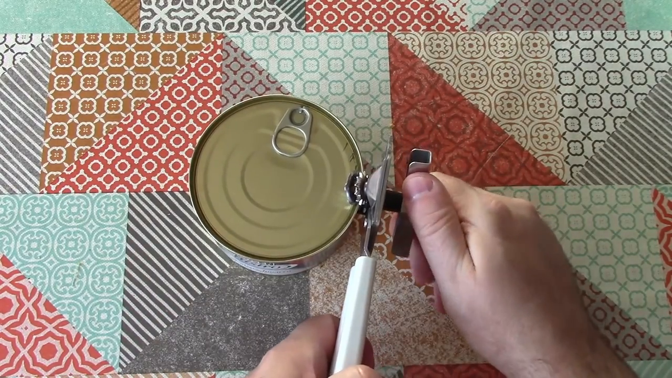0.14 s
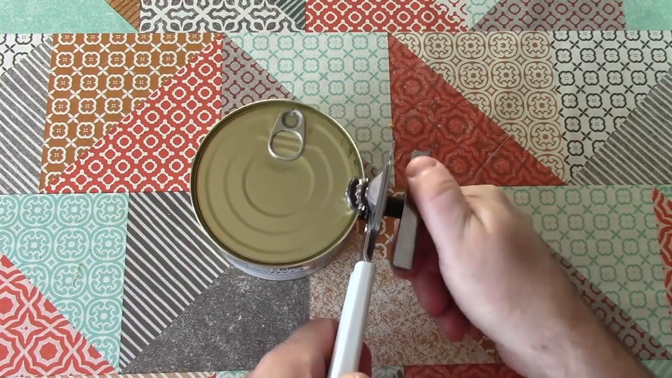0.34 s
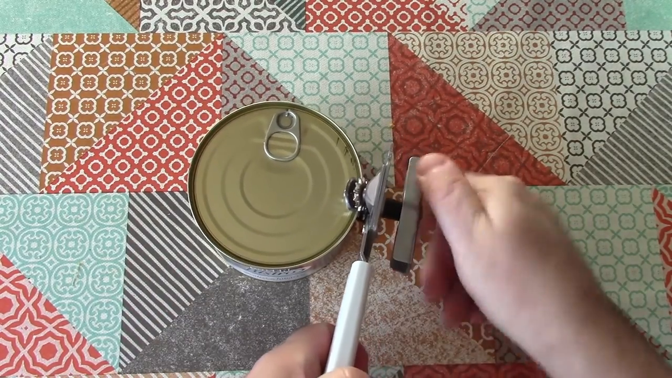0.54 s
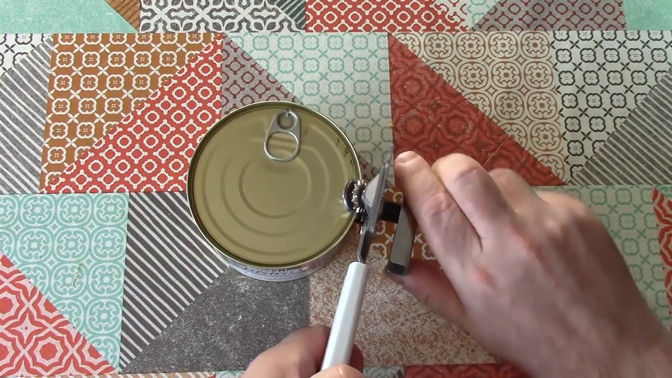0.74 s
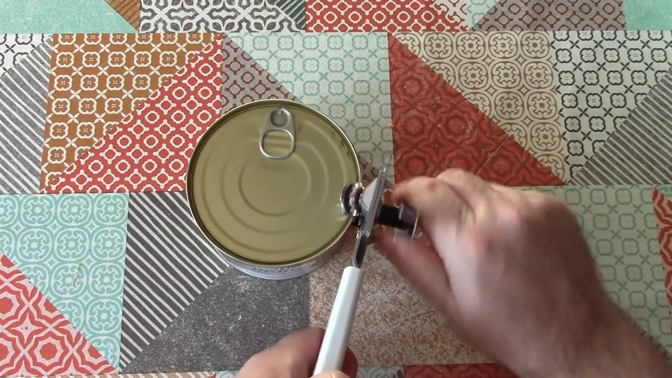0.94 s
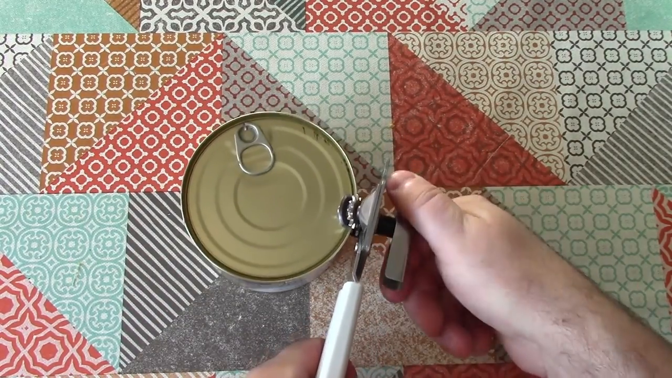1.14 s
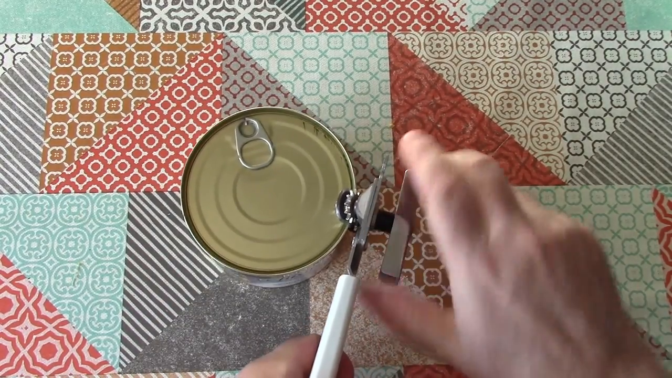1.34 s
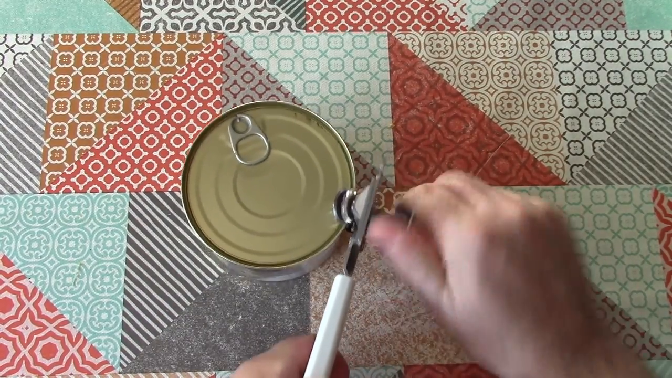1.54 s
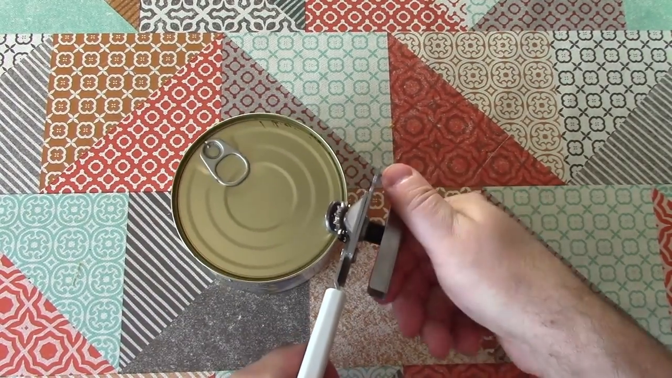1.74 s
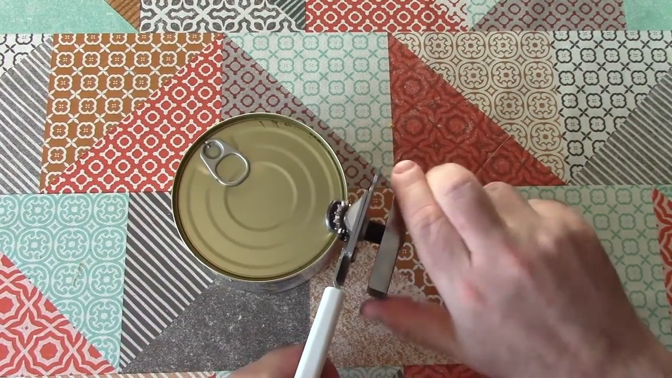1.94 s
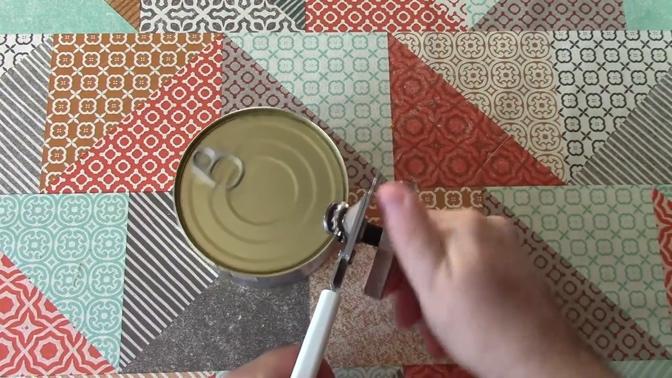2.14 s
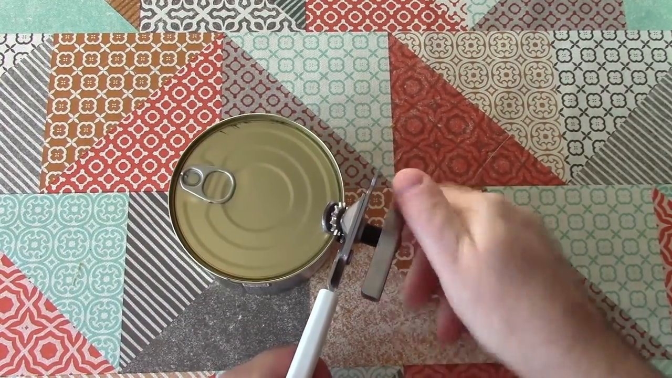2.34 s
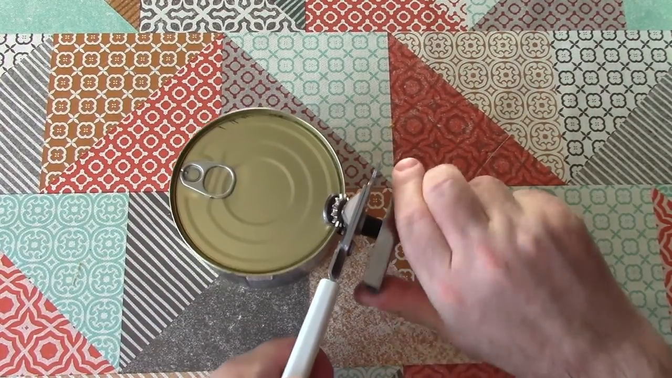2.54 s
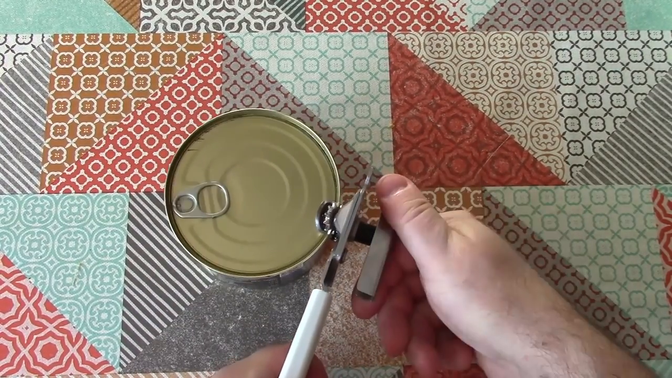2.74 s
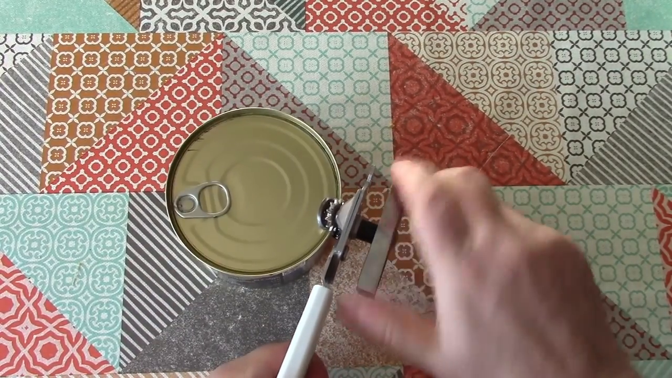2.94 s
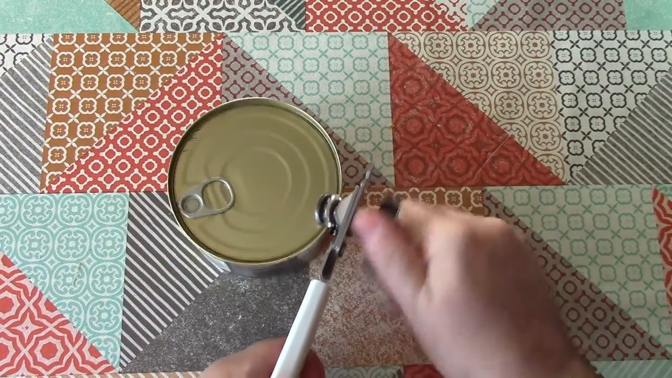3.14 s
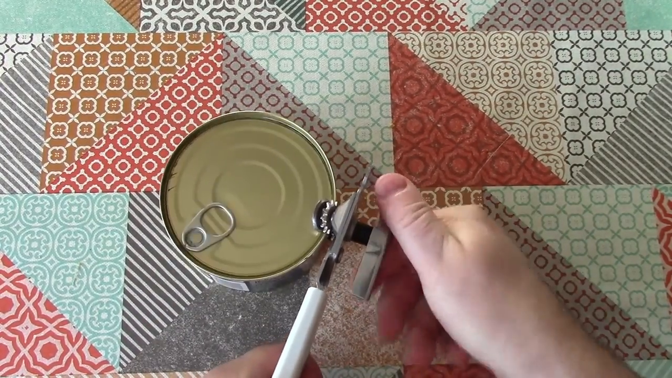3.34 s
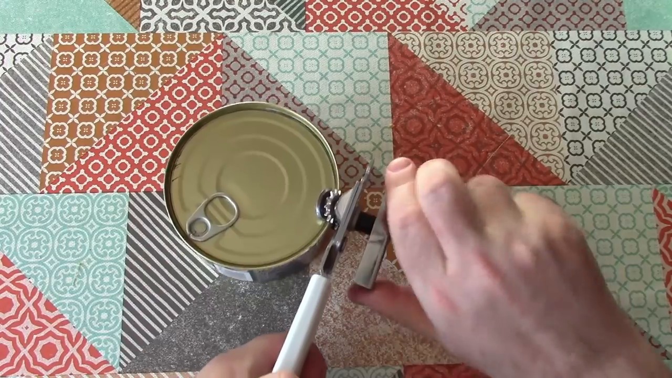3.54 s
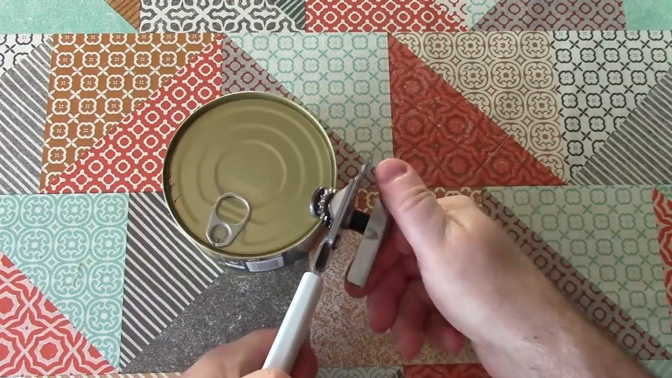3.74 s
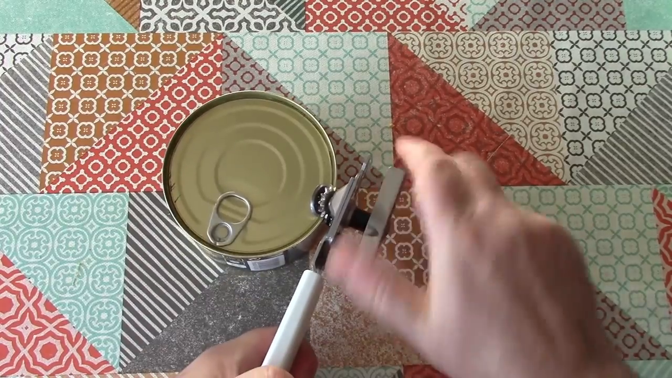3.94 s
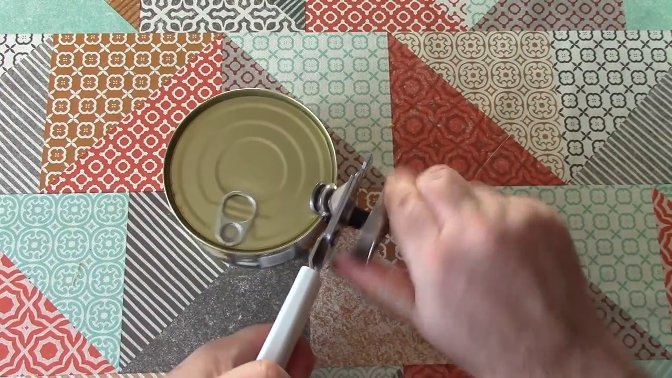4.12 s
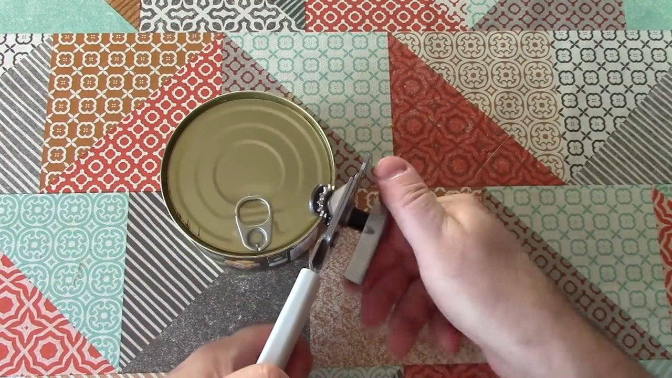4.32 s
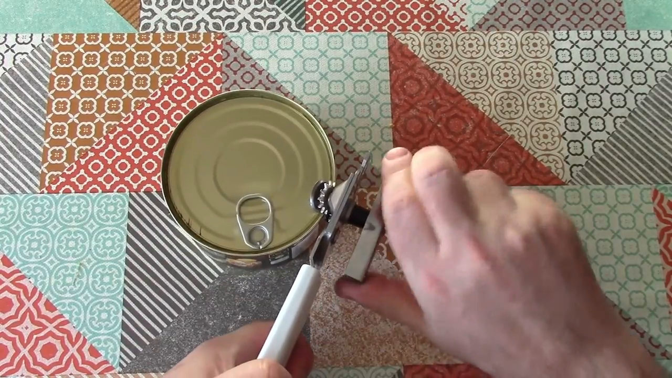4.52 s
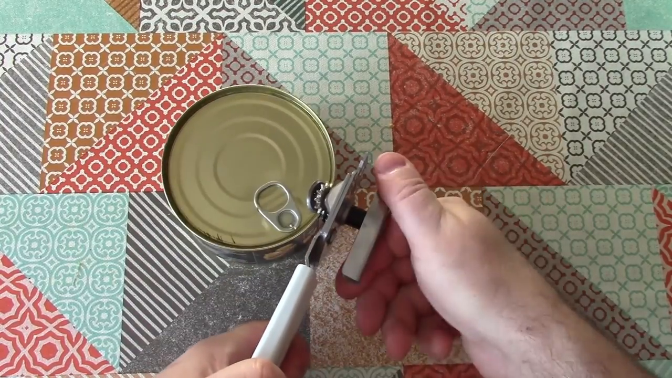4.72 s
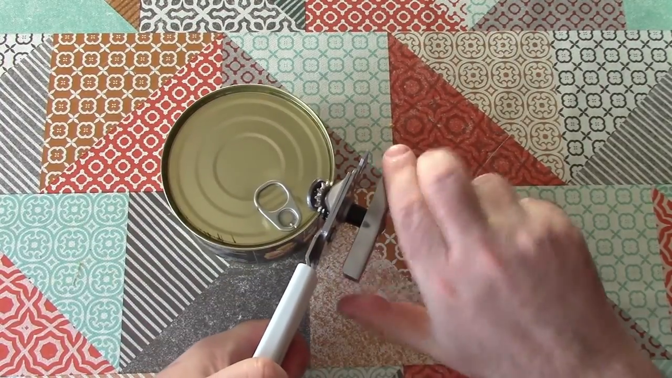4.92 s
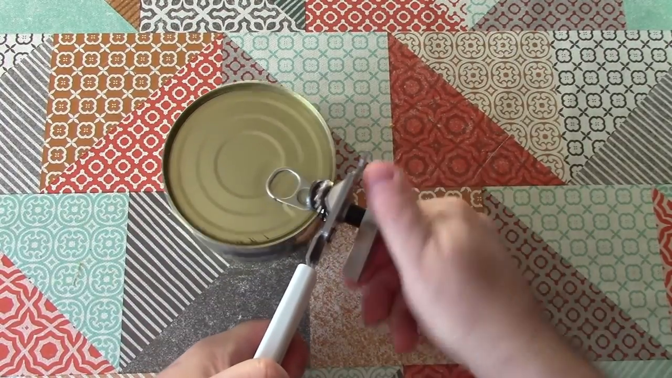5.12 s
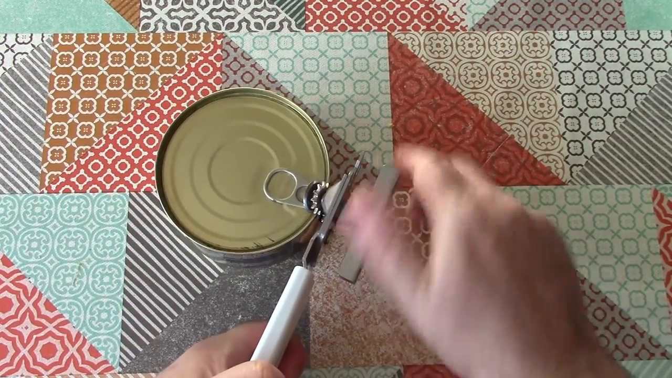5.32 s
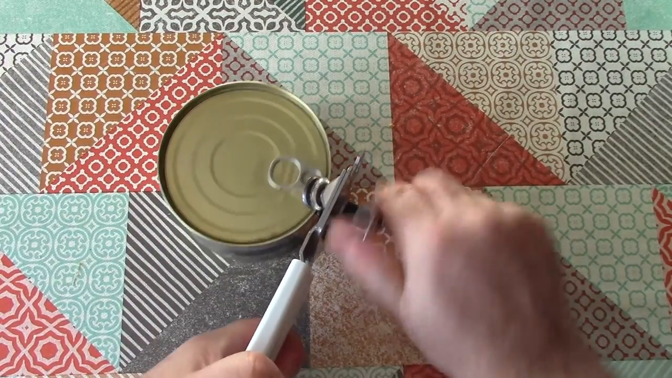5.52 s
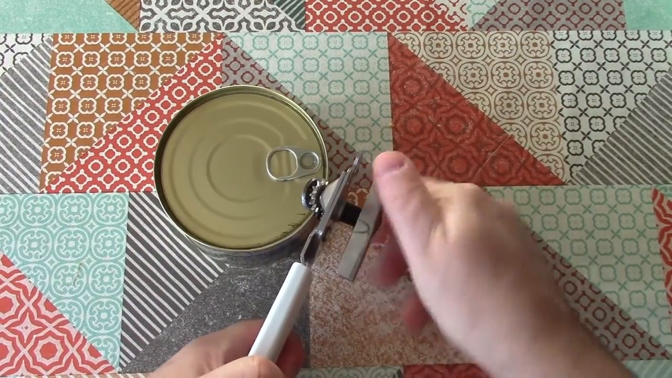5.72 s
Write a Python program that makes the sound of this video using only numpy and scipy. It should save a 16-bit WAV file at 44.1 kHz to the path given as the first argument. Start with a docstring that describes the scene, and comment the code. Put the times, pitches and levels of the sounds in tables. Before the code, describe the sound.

Rhythmic gritty metallic crunches with sharp clicks, roughly two a second, as a can opener is cranked around a tin; light handling between.

```python
"""A hand-turned can opener walks round a full tin on a covered table, heard from close by. Each half turn of
the key grinds the wheel through the lid (rough noise ringing the tin), while the feed gear snaps tooth by
tooth over the rim (short noise bursts). The loose steel key jingles and the table booms softly (fading sine
waves), and fingers peel off the steel (fizzing noise). A quiet room answers and hums behind (shaped noise)."""
import sys
import numpy as np
from scipy import signal
from scipy.fft import rfft, irfft, next_fast_len
from scipy.io import wavfile
from scipy.ndimage import map_coordinates

SR = 44100
rng = np.random.default_rng(int(sys.argv[2]) if len(sys.argv) > 2 else 0)


def inscribe(sig):
    """Save sig as 16-bit PCM at rate SR to the path in sys.argv[1].

    A 1-D sig is mono; a 2-D sig holds one channel per row.
    Samples are clipped to [-1, 1] before scaling.
    """
    pcm = np.round(np.clip(np.atleast_2d(sig).T, -1, 1) * 32767)
    wavfile.write(sys.argv[1], SR, pcm.astype(np.int16))


N = 259175  # length in samples

# Half turns of the key. Each row: wheel bites in seconds, push lasts in seconds, swell to the bite in dB/s,
# fall after the push in dB/s, grind at the bite in dB, grind at the end of the push in dB, bass of the tin
# against its other tones in dB, highest cutter scrape in dB, highest tearing hiss in dB,
# delay from the bite to the strongest table sway in seconds, table sway in dB.
HALF_TURNS = [(0.361, 0.021, 900, 235, -38.5, -33, 1, -56, -49, 0.059, -39),
              (0.923, 0.17, 700, 183, -37.5, -26, -1, -47.5, -51, 0.21, -39),
              (1.553, 0.091, 608, 201, -33, -20.5, 2.5, -35, -44.5, .04, -31),
              (2.108, 0.092, 1500, 240, -26, -21.5, -1.5, -33.5, -43.5, 0.11, -27),
              (2.634, 0.086, 500, 261, -30, -19.5, -2.5, -34.5, -44, 0.086, -26.5),
              (3.145, 0.086, 700, 269, -26.5, -17.5, -6.5, -40, -47, .16, -36.5),
              (3.693, 0.067, 350, 270, -26.5, -18.5, -2.5, -34.5, -44, 0.11, -45.5),
              (4.176, 0.058, 603, 253, -26, -20.5, -5, -29.5, -40, .11, -36.5),
              (4.657, 0.044, 504, 276, -26, -19.5, 1.5, -30.5, -41.5, 0.043, -30),
              (5.103, 0.06, 800, 236, -28.5, -16, 0.5, -30.5, -42, 0.076, -32),
              (5.555, 0.054, 600, 243, -30, -16.5, -0.5, -33.5, -42, 0.08, -25)]


def amp(db):
    """Turn decibels into a gain."""
    return 10 ** (np.asarray(db) / 20)


def unit(x):
    """Scale a sound to an average (RMS) level of one."""
    return x / np.sqrt(np.mean(x ** 2) + 1e-20)


def shape(points):
    """Gain at any frequency, from (Hz, dB) points joined on a log axis."""
    f, v = np.transpose(points)
    return lambda hz: amp(np.interp(np.log(hz + 1), np.log(f + 1), v, left=-120))


def resonant(modes):
    """Response of (Hz, width in Hz, dB) resonances; widths under 22 Hz are raised to 22."""
    def peak(f, center, width):
        return 1j * f * width / (center * center - f * f + 1j * f * width)

    def response(f):
        # neighbours have opposite signs
        return sum((-1) ** k * amp(db) * peak(f, center, max(width, 22))
                   for k, (center, width, db) in enumerate(modes))
    return response


def causal(gain):
    """A response with this gain that answers at once and never early (minimum phase)."""
    cepstrum = irfft(np.log(gain + 1e-6))
    # fold the half before time zero onto the half after it
    cepstrum[1:len(cepstrum) // 2] *= 2
    cepstrum[len(cepstrum) // 2 + 1:] = 0
    return np.exp(rfft(cepstrum))[:len(gain)]


def filtered(x, response):
    """Shape the spectrum of a sound by a response of frequency."""
    m = 2 * next_fast_len(N // 2 + SR // 4)  # spare room for ringing
    return irfft(rfft(x, m) * response(np.fft.rfftfreq(m, 1 / SR)), m)[..., :N]


def wobble(rate):
    """A smooth random curve through this many random points a second."""
    knots = rng.standard_normal(int(N * rate / SR) + 4)
    return map_coordinates(knots, [np.arange(N) * rate / SR])


def grit(rate, spread_db):
    """Noise whose level wavers quickly, like many tiny slips."""
    return unit(rng.standard_normal(N) * amp(spread_db * wobble(rate)))


def add(track, s, sound):
    """Mix a sound into the track at s seconds."""
    track[round(s * SR):][:len(sound)] += sound


def swell(start, end, start_db, end_db, rise, fall):
    """Gain of events that rise to their start, run straight to their end and fall, in dB/s; powers add."""
    t = np.arange(0, N + 64, 32)[:, None] / SR  # every 32 samples is fine enough
    along = np.clip((t - start) / np.maximum(end - start, 1e-4), 0, 1)
    before = np.maximum(start - t, 0)
    after = np.maximum(t - end, 0)
    db = start_db + (end_db - start_db) * along - rise * before - fall * after
    return np.interp(np.arange(N) / SR, t[:, 0], np.sqrt(np.sum(amp(db) ** 2, axis=1)))


def struck(events, families, attack, shake_db, spread_db):
    """Each event rings every family of modes at its own strength, as slightly unsteady fading sines."""
    out, t = np.zeros(N + SR), np.arange(SR // 4) / SR
    for s, *family_db in events:
        for db, modes in zip(family_db, families):
            for hz, level, t60 in modes:
                shake = shake_db * np.interp(t, np.linspace(0, t[-1], 50), rng.standard_normal(50))
                fading_db = db + level + spread_db * rng.normal() + shake - 60 * t / t60
                ring = amp(fading_db) * np.sin(2 * np.pi * hz * t)
                add(out, s, ring * (1 - np.exp(-t / attack)))
    return out[:N]


def in_tin(force):
    """The tin answers with main tones over a broad bed of small ones; its bass drifts from turn to turn."""
    # Broad bed of the tin. Each row: frequency in Hz, level in dB per Hz.
    bed = [(100, -10), (250, -12.5), (600, -5.5), (1200, -16), (1700, -19), (2100, -17.5), (3600, -25.5),
           (5000, -14), (16000, -111)]
    # Main tones of the full tin. Each row: frequency in Hz, width in Hz, level in dB.
    tones = [(218, 31, -5), (241, 13.8, -4), (277, 26.3, 3.5), (331, 93, -2), (406.4, 10, -4.5),
             (498.1, 27.4, 6), (550, 11.8, -15.5), (732, 57, -28), (768, 13, -10), (918, 70, -5),
             (1090, 22, -6.5), (1197, 35, -9), (1341.5, 30, -7), (1560, 15, -9), (1714, 15, -12.5)]

    def response(f):
        power = shape(bed)(f) ** 2 + sum(abs(resonant([tone])(f)) ** 2 for tone in tones)
        soften = 1 / (1 + (f / 3000) ** 4)
        return causal(np.sqrt(power) * soften)

    ring = filtered(force, response)
    low_ring = filtered(ring, lambda f: 1 / (1 + (f / 334) ** 6))  # keeps what lies below about 334 Hz
    bite, push, *_, bass_db = np.transpose(HALF_TURNS)[:7]
    bass = amp(np.interp(np.arange(N) / SR, bite + push, bass_db))
    return ring + (bass - 1) * low_ring


def in_wheel(force):
    """The cutting wheel answers in one broad band."""
    # Tones of the cutting wheel, applied twice. Each row: frequency in Hz, width in Hz, level in dB per pass.
    wheel_tones = [(2316, 580, -3.5), (3050, 1300, -1.5)]

    def response(f):
        soften = 1 / (1 + 1j * f / 4000) ** 3
        return resonant(wheel_tones)(f) ** 2 * soften
    return filtered(force, response)


def efforts():
    """Gains of grind, scrape, hiss and table sway, from the turns and the hands shifting between them."""
    # Hands shifting on key and handles. Each row: time in seconds, shuffle in the tin in dB, skin hiss in dB.
    hand_shifts = [(0.291, -48, -56), (0.47, -63, -49), (0.61, -63, -56), (0.769, -46.5, -66),
                   (1.22, -53, -77), (1.29, -53, -69), (1.41, -50, -63), (1.85, -58, -66), (1.9, -57, -62),
                   (2.39, -54.5, -60), (2.96, -56.5, -62), (3.4, -50.5, -66), (3.64, -55, -61),
                   (3.93, -50.5, -68), (4.4, -52, -65), (4.86, -52, -63), (4.93, -64, -61),
                   (5.39, -72, -61.5), (5.76, -64, -62)]
    rub_rise, rub_fall, skin_fall = 302, 139, 404  # dB/s
    settle_db, settle_fall = -33.5, 95  # faint slower tail as tin and opener settle: dB under the grind, dB/s
    scrape_bite_db, scrape_fall = -12.5, 1.31  # dB under its top at the bite, times the fall of the grind
    tear_bite_db, tear_hold, tear_fall = -11, 0.0089, 1.29  # the same for the hiss, held longer in seconds
    sway_rise, sway_fall = 504, 208  # dB/s

    bite, push, rise, fall, bite_db, off_db, _, scrape_db, tear_db, lag, sway_db = np.transpose(HALF_TURNS)
    rub, shuffle_db, skin_db = np.transpose(hand_shifts)
    off = bite + push
    turning = swell(bite, off, bite_db, off_db, rise, fall)
    settle = swell(off, off, off_db + settle_db, off_db + settle_db, rise, settle_fall)
    loose = settle + swell(rub, rub, shuffle_db, shuffle_db, rub_rise, rub_fall)
    scrape = swell(bite, off, scrape_db + scrape_bite_db, scrape_db, rise, scrape_fall * fall)
    tear = swell(bite, off + tear_hold, tear_db + tear_bite_db, tear_db, rise, tear_fall * fall)
    skin = swell(rub, rub, skin_db, skin_db, rub_rise, skin_fall)
    sway = swell(bite + lag, bite + lag, sway_db, sway_db, sway_rise, sway_fall)
    grind = turning + loose
    # the cutter also scrapes under the shuffle, and the table sways a little with all grinding
    return grind, scrape + amp(-16) * loose, tear + skin, sway + amp(-17) * grind


def air():
    """Steady hum and hiss of the room, nearly alike in both channels."""
    # Colour of the room noise. Each row: frequency in Hz, relative level in dB.
    air_color = [(18, -32), (30, -1), (108, -2), (244, 1.5), (371, -4), (977, -13), (1140, -12),
                 (1300, -13), (1690, -17), (5650, -24), (6110, -24.5), (15700, -38)]
    mid, side = (unit(filtered(rng.standard_normal(N), shape(air_color))) for _ in range(2))
    return amp(-54.5) * np.array([mid + 0.45 * side, mid - 0.22 * side])


def table():
    """The turning hands keep the table's lowest tone wavering; bumps ring table and tin outright."""
    # Hands bumping things. Each row: time in seconds, table strength in dB, tin strength in dB.
    hand_bumps = [(0.211, -45.5, -44.5), (0.763, -28, -34.5), (1.124, -32.5, -53), (1.29, -36, -57),
                  (1.395, -36.5, -36), (1.497, -39.5, -47), (1.973, -51, -45), (2.495, -51.5, -71),
                  (2.612, -64, -34), (3.124, -39, -28), (3.533, -40, -61), (3.643, -66, -31),
                  (4.144, -64, -33.5), (4.52, -59, -60), (4.853, -60, -36), (4.956, -41.5, -64),
                  (5.085, -40, -34.5), (5.295, -48, -35.5), (5.497, -45.5, -60), (5.753, -41, -37)]
    # Tones of a thud, table first, then tin. Each row: frequency in Hz, level in dB, time to fade 60 dB in seconds.
    thud_tones = [
        [(137, 3.5, 0.25), (95, -5, 0.073)],
        [(252, 7.5, 0.041), (312, 3, 0.043)],
    ]
    table_hz = 129.1 * (1 + 0.0773 * wobble(30))
    phase = 2 * np.pi * np.cumsum(table_hz) / SR
    sway = efforts()[-1] * amp(3.07 * wobble(45)) * np.sin(phase)
    return sway + struck(hand_bumps, thud_tones, attack=.0015, shake_db=1.2, spread_db=1.5)


def teeth():
    """Each gear tooth snapping over the rim, and each clank of the loose key on its frame, is a short bright
    crack, a jolt of the cutter and a blow on the tin."""
    # Teeth snapping over the rim, and between turns the loose key clanking against its frame. Each row: time in
    # seconds, then the # relative strengths in dB of the crack, the ring of the cutter and the knock in the
    # tin.
    snaps_and_clanks = [(0.2116, -34, -60, -63), (0.2985, -38, -61, -21.5), (0.3595, -26, -35, -15.5),
                        (0.762, -34, -39, -50), (0.9213, -28.5, -28, -14.5), (0.958, -51, -44, -39),
                        (0.9818, -40, -25.5, -15), (1.0053, -22, -34, -15), (1.0202, -19.5, -17, -21),
                        (1.0526, -12.5, -17.5, -9), (1.0864, -21, -48, -35), (1.1235, -22, -29, -23.5),
                        (1.393, -26, -60, -43), (1.439, -32.5, -51, -47), (1.48, -35.5, -60, -48),
                        (1.5514, -40, -47, -29), (1.584, -13.5, -14.5, -9.5), (1.605, -9.5, -22, -6),
                        (1.6127, -33, -17, -3.5), (1.625, -19, -14, -17), (1.6961, -22, -16.5, -15.5),
                        (1.7804, -42, -62, -56), (1.8033, -37.5, -46, -31.5), (1.8274, -45, -57, -49),
                        (2.1064, -21, -15.5, -13.5), (2.137, -18, -18, -5.5), (2.1596, -22, -23, -10),
                        (2.1814, -9.5, -9.5, -14), (2.2034, -37, -12.5, -15), (2.3418, -34, -41, -33),
                        (2.391, -45, -26.5, -50), (2.582, -40, -55, -45), (2.6085, -34, -51, -36),
                        (2.63, -20, -23, -15.5), (2.6613, -24, -31, -12.5), (2.6814, -9, -31, -8),
                        (2.6909, -13, -10, -22), (2.7147, -21, -12, -2.5), (2.7506, -20, -17, -15),
                        (2.8798, -35, -57, -34.5), (3.0195, -54, -47, -34), (3.1224, -45, -44, -30),
                        (3.1327, -49, -26.5, -34), (3.1419, -20, -13.5, -8.5), (3.1699, -14, -13.5, -5.5),
                        (3.192, -17, -32, -15), (3.2152, -10, -37, 0), (3.2362, -17.5, -42, -5),
                        (3.3147, -52, -53, -28), (3.4112, -48, -28.5, -31.5), (3.6424, -48, -54, -41),
                        (3.6843, -21, -19, -15), (3.708, -13.5, -43, -12), (3.7247, -5, -39.5, -8),
                        (3.7417, -6, -19, -39), (3.7593, -31, -30, -25), (3.795, -21, -21, -43),
                        (3.923, -34, -37, -31), (4.1437, -52, -52, -40), (4.1674, -17.5, -6.5, -10),
                        (4.19, -18, -14, -16), (4.2004, -28, -33, -12), (4.2101, -11, -30, -6),
                        (4.2229, -14, -31, -8), (4.2399, -9.5, -12, -12), (4.398, -48, -30.5, -45),
                        (4.6349, -20, -22, -16.5), (4.6561, -13, -22.5, -36), (4.673, -14.5, -31, -40),
                        (4.682, -7, -35, -26), (4.7023, -14, -11.5, -7), (4.729, -26.5, -16, -13),
                        (4.8354, -35, -49, -52), (4.8532, -49, -32, -30), (4.99, -58, -59, -33.5),
                        (5.063, -30, -51, -55), (5.1037, -18, -13.5, -11), (5.125, -15, -10.5, -13),
                        (5.1436, -19, -22, -10), (5.1586, -3.5, -33, -10), (5.1769, -11, -17.5, -5),
                        (5.3281, -33, -30.5, -39), (5.4552, -61, -72, -32.5), (5.5, -40, -60, -52),
                        (5.5393, -40, -26, -26), (5.5526, -21.5, -20, -10), (5.5762, -18.5, -34, -29),
                        (5.5938, -8, -42, -4.5), (5.611, -20, -35, -15), (5.627, -17, -35, -24),
                        (5.665, -30, -37, -32), (5.752, -37, -45, -43)]
    # Colour of the crack. Each row: frequency in Hz, level in dB.
    crack_color = [(800, -1), (2500, -6), (5000, -6), (8000, -5.5), (11000, -13.5), (13500, -25.5),
                   (16000, -24)]
    crack, jolt, blow = np.zeros((3, N + SR))
    t = np.arange(SR // 20) / SR
    rise = 1 - np.exp(-t / .0004)
    snap = amp(-60 * t / .006)  # fades 60 dB in 6 ms
    faint_tail = 0.068 * amp(-60 * t / 0.2)
    for s, crack_db, ring_db, knock_db in snaps_and_clanks:
        burst = rng.standard_normal((3, len(t))) * rise
        # an echo 3 to 11 samples later gives each crack its own colour
        burst[0] += 0.17 * np.roll(burst[0], rng.integers(3, 12))
        add(crack, s, amp(crack_db + 2) * unit(burst[0]) * (snap + faint_tail))
        add(jolt, s, amp(ring_db + 21.5 - 60 * t / 0.008) * burst[1])
        add(blow, s, amp(knock_db + 15 - 60 * t / 0.012) * burst[2])
    bright = filtered(crack[:N], lambda f: causal(shape(crack_color)(f)))
    return bright + in_wheel(jolt[:N]) + in_tin(blow[:N])


def cut():
    """The wheel grinds the lid in small slips and scrapes; the metal hisses as it tears."""
    # Colour of the low rumble. Each row: frequency in Hz, relative level in dB.
    rumble_color = [(30, -21), (65, 9), (85, -2), (110, 1), (160, 9), (200, -14), (300, -40.5)]
    # Colour of the hiss. Each row: frequency in Hz, relative level in dB.
    hiss_color = [(2000, -30), (3800, -4), (5000, -3), (8500, 0), (9800, -4), (11500, -12), (14000, -17),
                  (16000, -26)]
    grind, scrape, hiss, _ = efforts()
    slips = grit(500, spread_db=1.5)
    body = in_tin(grind * slips) / np.std(in_tin(slips))
    wheel = scrape * unit(in_wheel(grit(520, spread_db=4.5)))
    rumble = amp(-16.5) * grind * unit(filtered(rng.standard_normal(N), shape(rumble_color)))
    tear = hiss * unit(filtered(grit(900, spread_db=2.5), shape(hiss_color)))
    return body + wheel + rumble + tear


def fingers():
    """Skin lets go of the steel with a tick, then fizzes for a moment; once it slides with a thin rough squeak."""
    # Skin peeling off key or handles. Each row: time in seconds, relative strength in dB, fizz length in seconds.
    peels = [(0.551, -44.5, 0.065), (0.746, -66, 0.03), (1.287, -48, 0.024), (1.882, -39, 0.034),
             (1.8959, -33, 0.018), (2.9517, -31, 0.021), (4.448, -49, 0.016), (4.897, -30.5, 0.019),
             (5.3598, -33, 0.014)]
    # Colour of the peeling skin. Each row: frequency in Hz, level in dB.
    skin_color = [(1500, -4.5), (4000, -4.5), (6500, 6.5), (10000, -5), (14000, -7), (16000, -18)]
    # Path of the sliding squeak. Each row: time in seconds, level in dB, pitch in Hz.
    squeak_path = [(.44, -59, 8600), (.468, -45, 8500), (.485, -53, 9600), (.50, -52, 8600),
                   (0.519, -67, 8100), (.59, -68, 8800), (0.607, -59, 9600), (0.614, -68, 6470),
                   (.628, -49, 6300), (.64, -69, 6200)]
    out, t = np.zeros(N + SR), np.arange(SR // 10) / SR
    tick = amp(-60 * t / .009)
    for s, db, length in peels:
        # the fizz jumps to a new random level every 60 samples
        grain = amp(3 * rng.standard_normal(len(t) // 60 + 1).repeat(60)[:len(t)])
        fizz = 0.2 * grain / (1 + (t / length) ** 4)
        add(out, s, amp(db) * rng.standard_normal(len(t)) * (tick + fizz))
    peeling = filtered(out[:N], lambda f: causal(shape(skin_color)(f)))

    s, db, hz = np.transpose(squeak_path)
    now = np.arange(N) / SR
    pitch = np.interp(now, s, hz) * (1 + 0.035 * wobble(900))
    level = amp(np.interp(now, s, db, -150, -150) + 2.7 * wobble(300))
    return peeling + level * np.sin(2 * np.pi * np.cumsum(pitch) / SR)


def key():
    """The loose key touches its frame lightly and rings softly in its own steel tones."""
    # Touches of the key. Each row: time in seconds, then the relative strengths in dB of its low, middle,
    # upper and top tones.
    touches = [(0.758, -56, -52, -64, -70), (1.301, -58, -72, -66, -75), (1.3204, -78, -75, -66, -56),
               (1.3903, -45, -59, -55, -57), (1.4354, -70, -52, -60, -70), (1.4784, -73, -65, -68, -75),
               (1.844, -67, -59, -58, -66), (1.8654, -50, -67, -73, -69), (1.954, -60, -78, -58, -51),
               (1.9686, -65, -70, -69, -69), (2.378, -72, -67, -57, -67), (2.391, -45.5, -44, -73, -70),
               (2.9055, -62, -56, -61, -73), (2.9203, -51, -68, -78, -77), (3.3962, -57, -66, -60, -70),
               (3.4114, -51, -75, -72, -60), (3.5114, -55.5, -61, -62, -54), (3.911, -75, -65, -54, -66),
               (3.9237, -52, -71, -53, -72), (3.9744, -66, -92, -68, -62), (4.3844, -76, -52, -55.5, -70),
               (4.3983, -47, -55, -56, -61), (4.8447, -75, -69, -55, -84), (4.8517, -57, -59, -69, -72),
               (4.9464, -58, -70, -63, -52), (4.9574, -64, -72, -61, -63), (5.3015, -63, -68, -59, -75),
               (5.3274, -48.5, -60, -68, -85), (5.7513, -52, -68, -54, -75)]
    # Tones of the key in those four families. Each row: frequency in Hz, relative level in dB,
    # time to fade 60 dB in seconds.
    key_tones = [
        [(2070, 0, .1), (2735, 8, .07), (3144, 6, .13), (3857, 3, .13)],
        [(5920, 5, .08)],
        [(7510, 5, .1), (8952, 11, .13)],
        [(10700, 7, .06)],
    ]
    return amp(-8) * struck(touches, key_tones, attack=.0035, shake_db=3, spread_db=1.5)


def creak():
    """A faint creak before one turn: rough slips heard through one narrow band."""
    # In order: start in seconds, end in seconds, level in dB, frequency in Hz, width of one filter pass in Hz.
    creak_settings = (3.5, 3.5, -48, 650, 51)
    start, end, db, hz, width = np.array(creak_settings)[:, None]
    band = filtered(grit(100, spread_db=7), lambda f: resonant([(hz, width, 0)])(f) ** 2)
    return swell(start, end, db, db, 300, 200) * unit(band)


def room(x):
    """A short fading answer of the walls, in opposite phase in the two channels."""
    t = np.arange(SR // 4) / SR
    tail = rng.standard_normal(len(t)) * amp(-60 * t / 0.29)
    answer = signal.fftconvolve(x, tail / np.linalg.norm(tail))[:N]
    return np.outer([1, -1], answer)


def scene():
    """The opener and table, a touch louder in the first channel, with the room around them."""
    near = cut() + table() + teeth() + key() + fingers() + creak()
    return near * amp([[.1], [-.1]]) + amp(-34.5) * room(near) + air()


def record(dry):
    """Thin out the deepest bass and keep nothing from the top limit up."""
    top_hz, bass_cut_hz = 15800, 55

    def response(hz):
        return (hz < top_hz) * (1j * hz / (bass_cut_hz + 1j * hz)) ** 3
    return filtered(dry, response)


dry = scene()
out = record(dry)
inscribe(out)
```